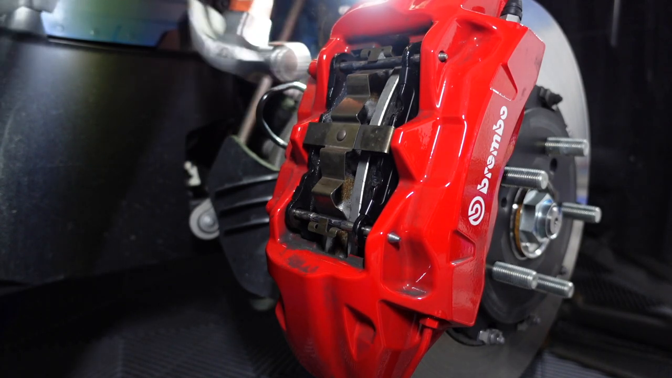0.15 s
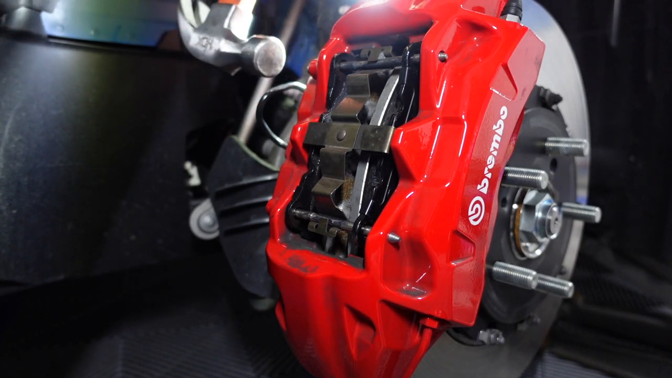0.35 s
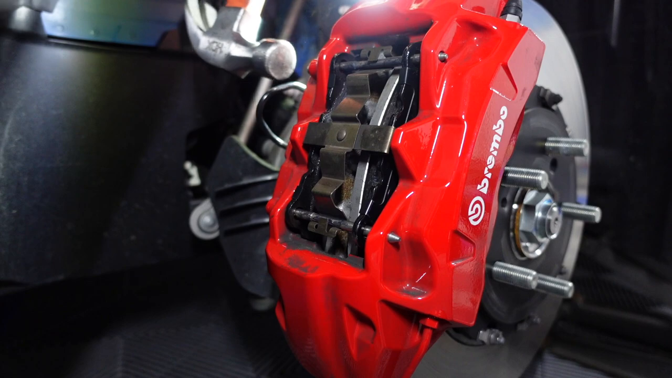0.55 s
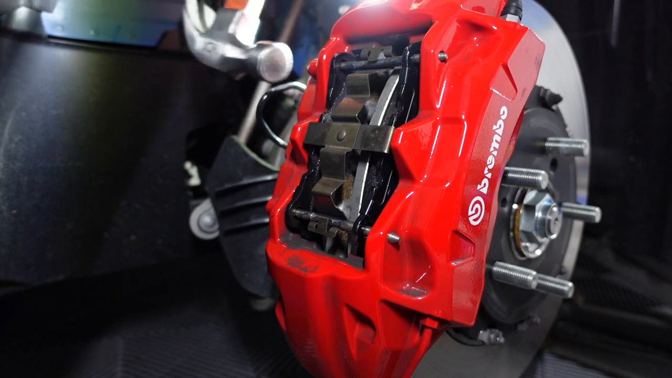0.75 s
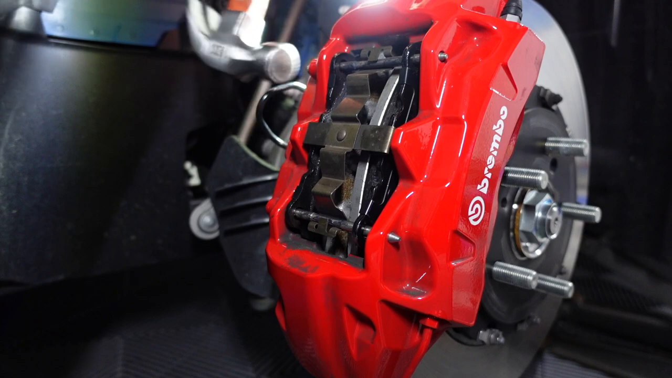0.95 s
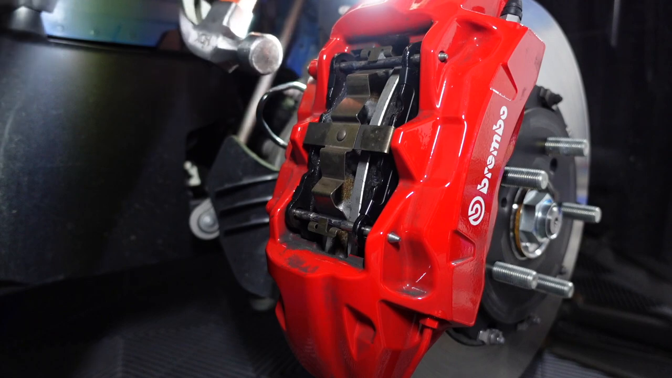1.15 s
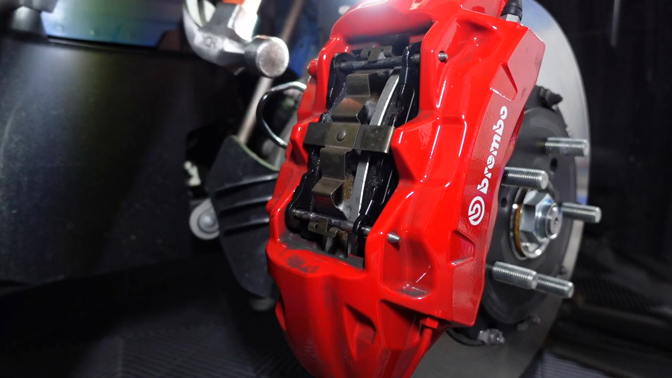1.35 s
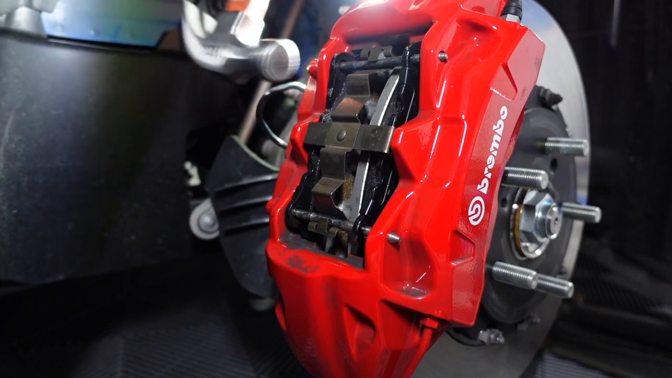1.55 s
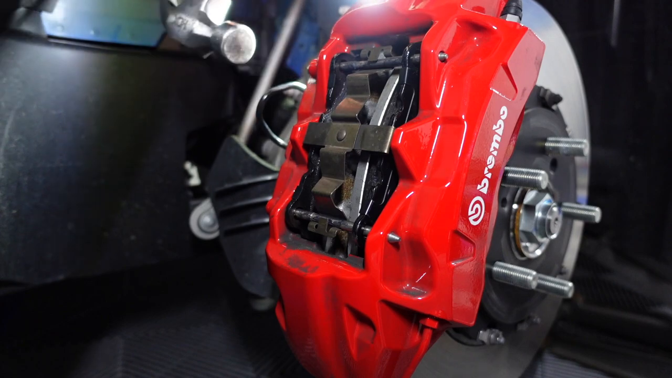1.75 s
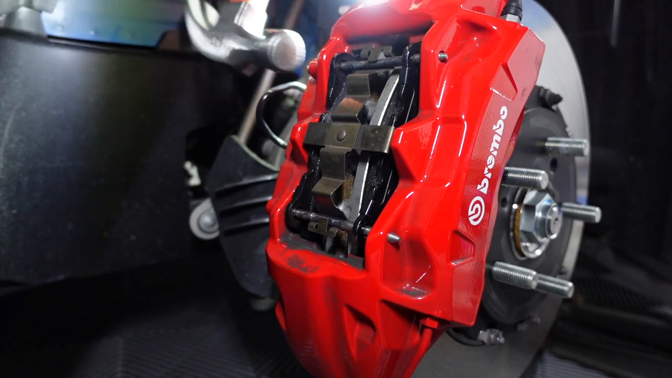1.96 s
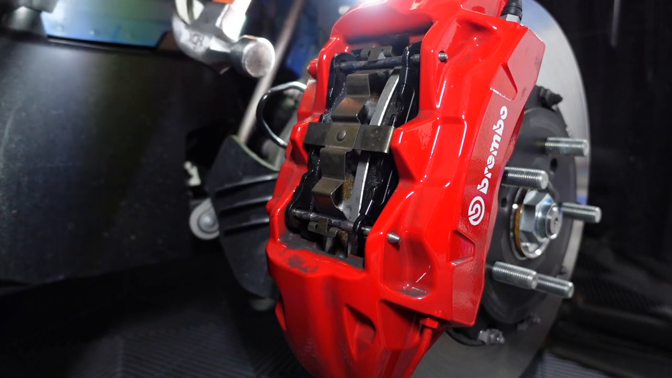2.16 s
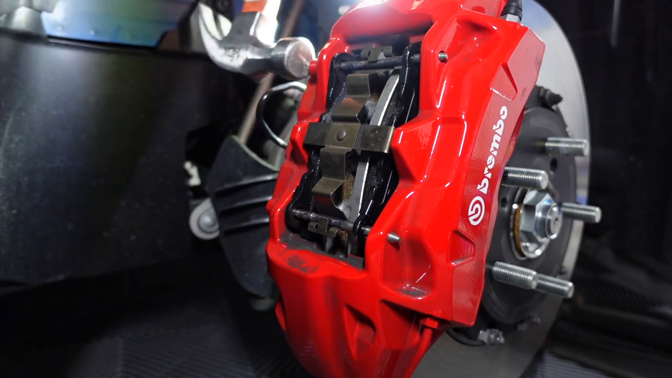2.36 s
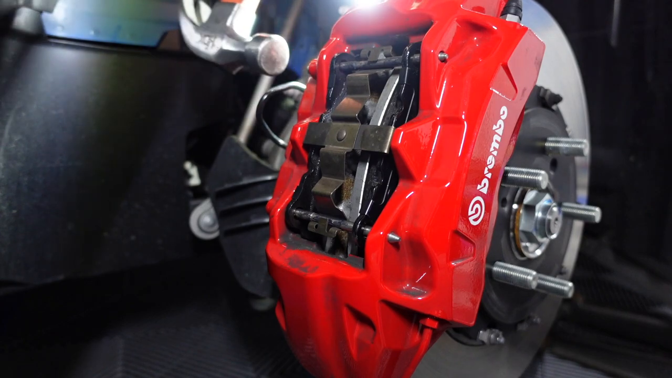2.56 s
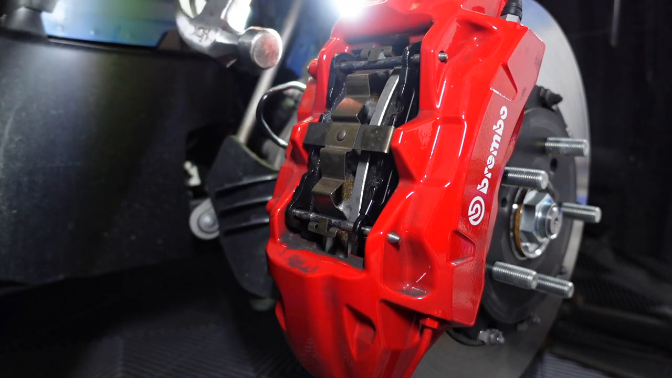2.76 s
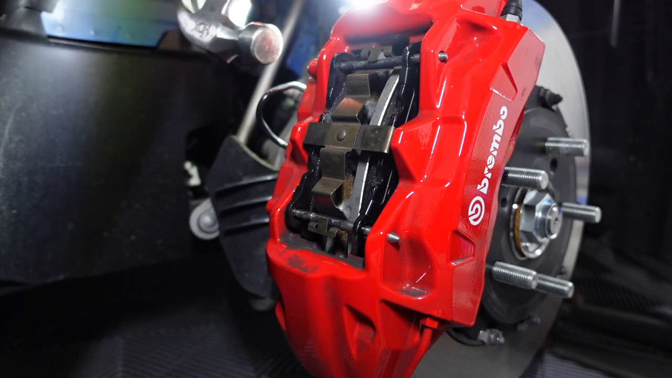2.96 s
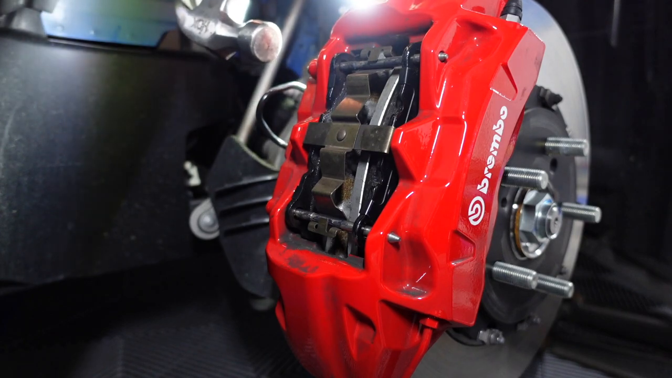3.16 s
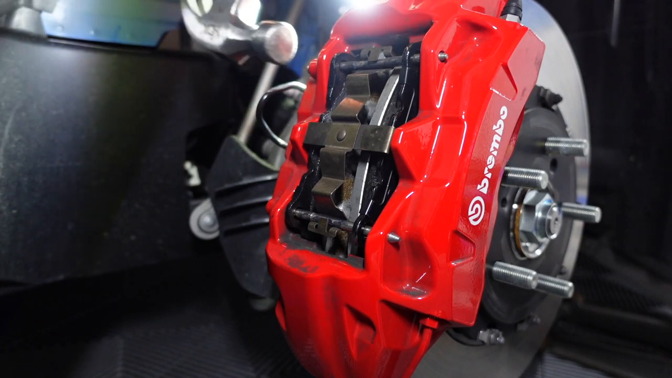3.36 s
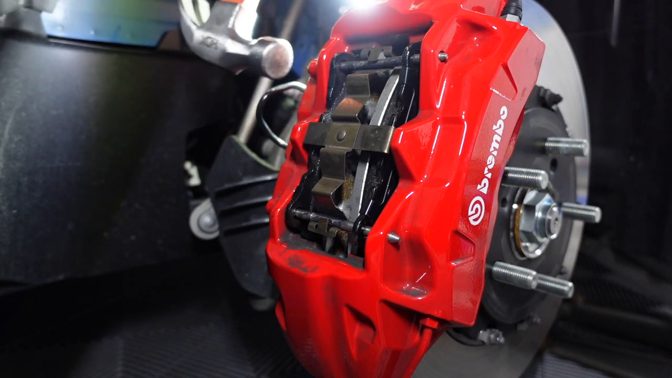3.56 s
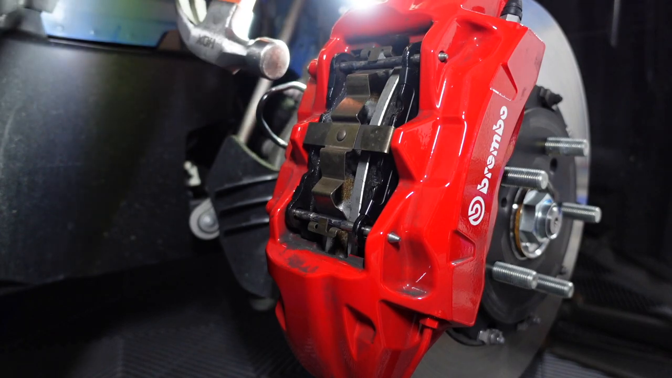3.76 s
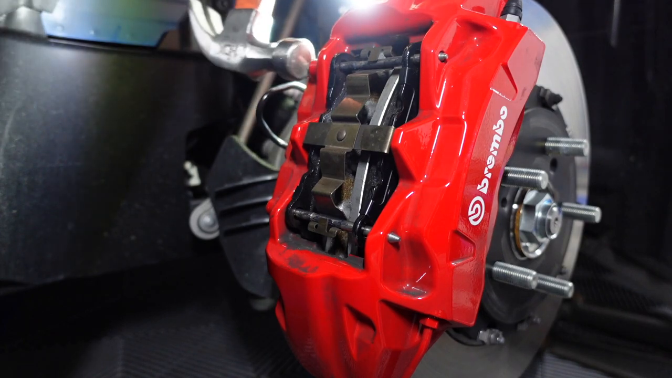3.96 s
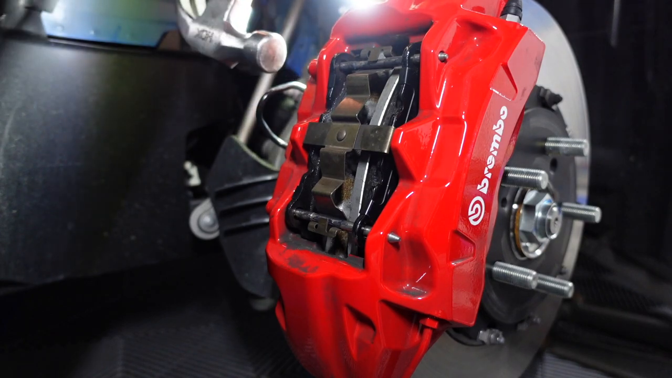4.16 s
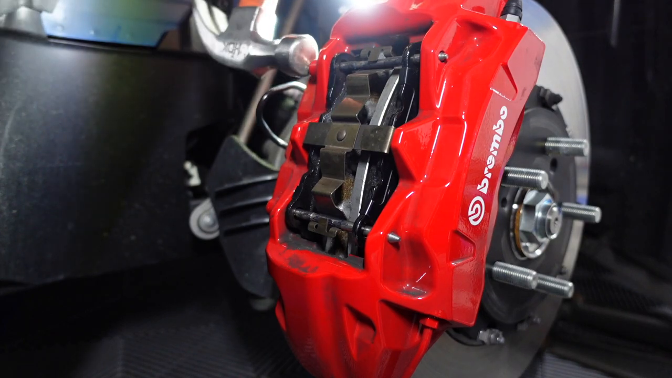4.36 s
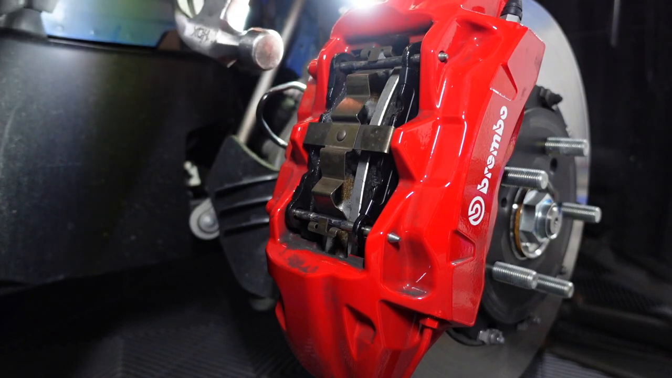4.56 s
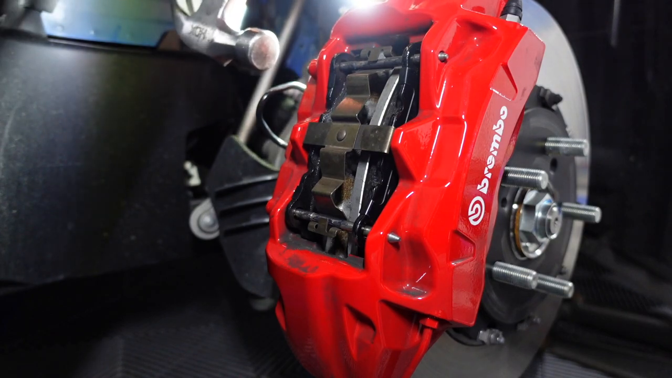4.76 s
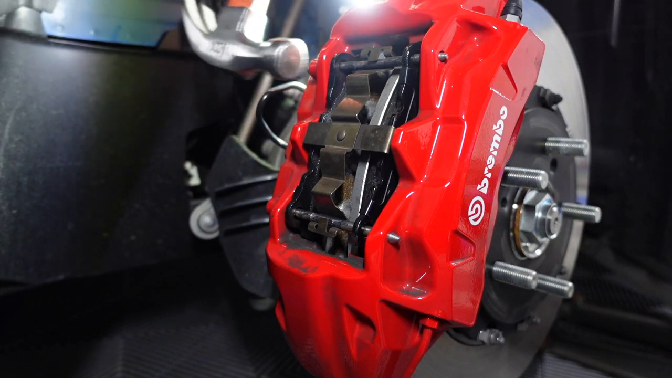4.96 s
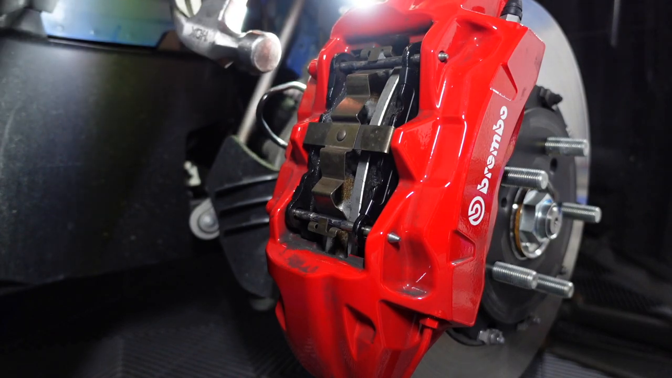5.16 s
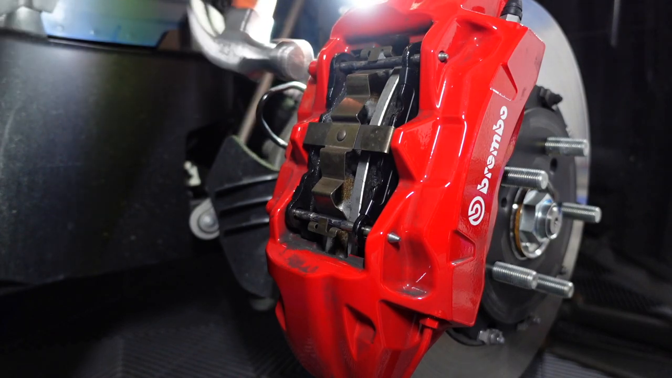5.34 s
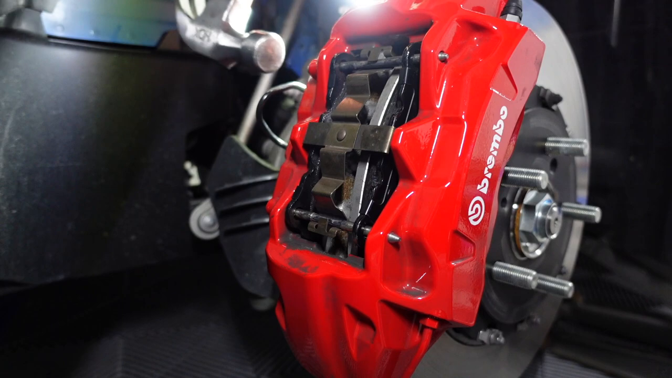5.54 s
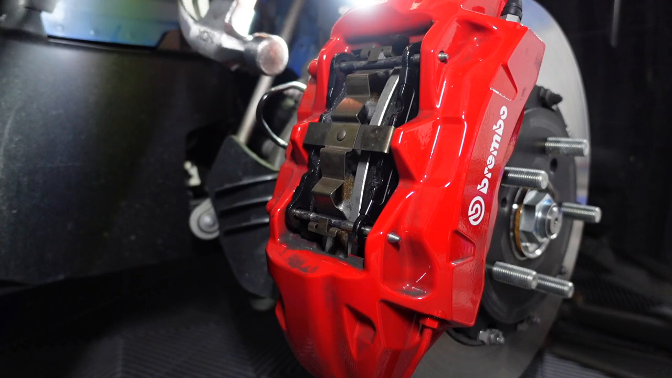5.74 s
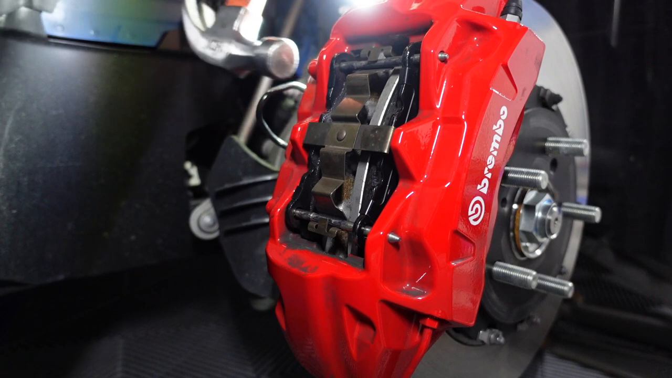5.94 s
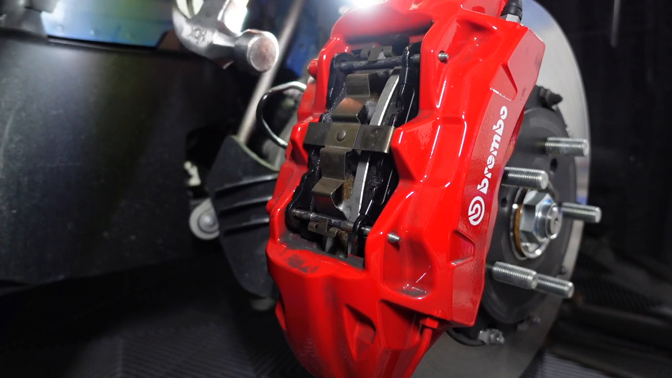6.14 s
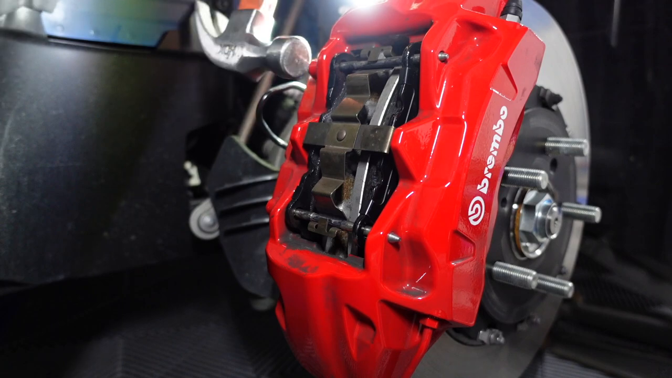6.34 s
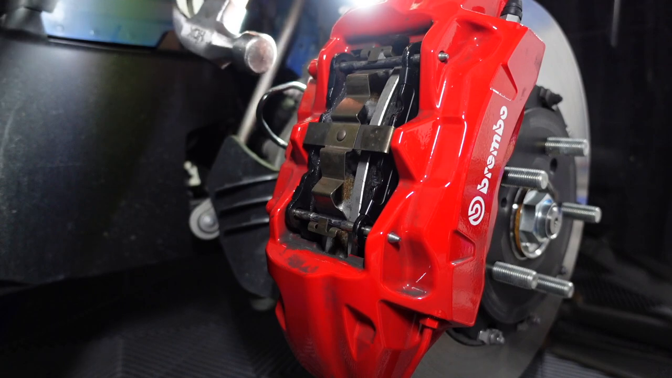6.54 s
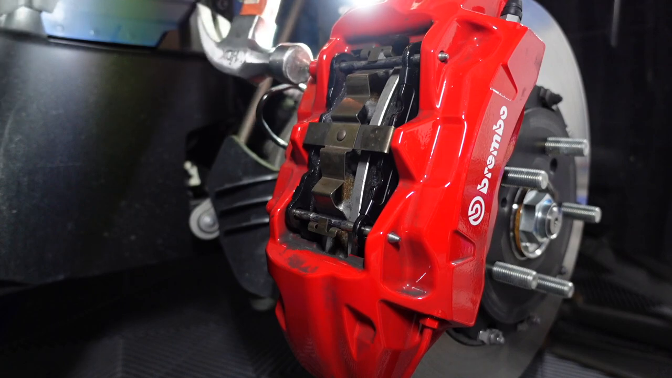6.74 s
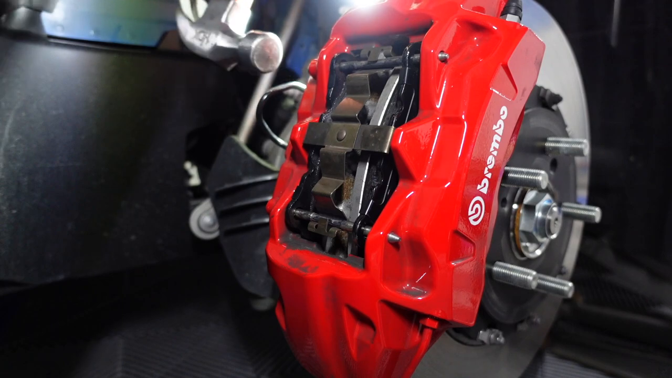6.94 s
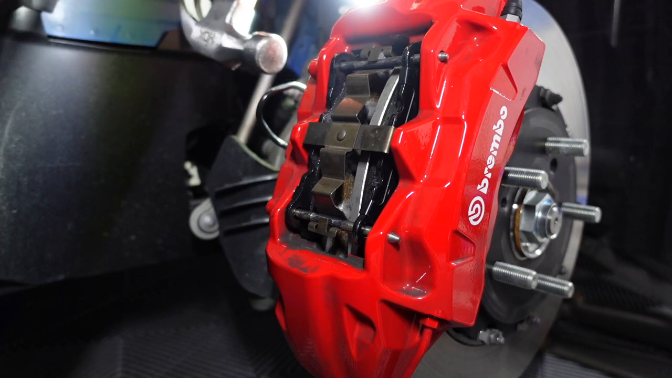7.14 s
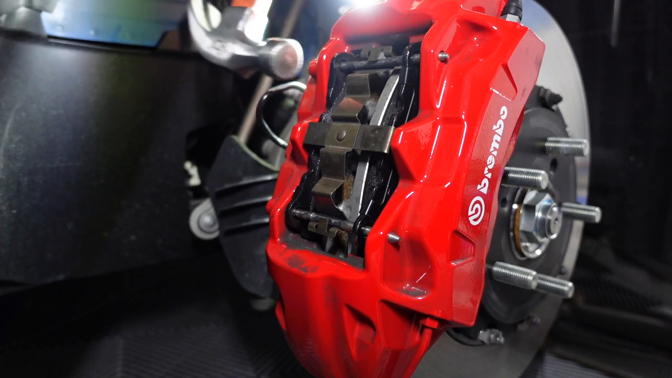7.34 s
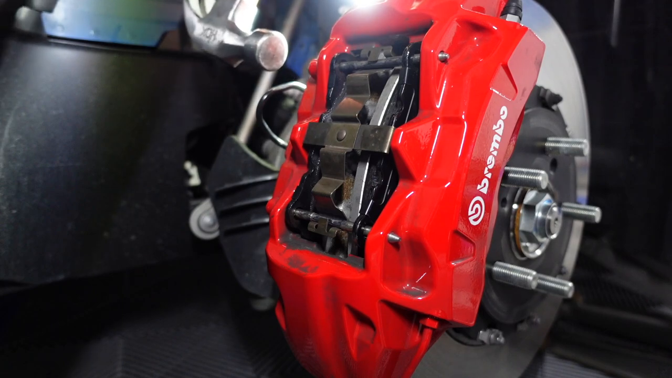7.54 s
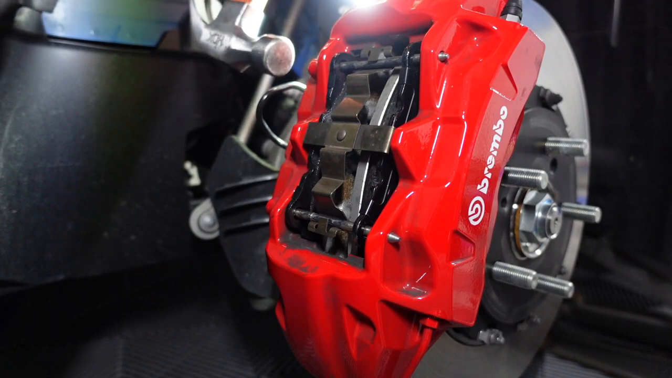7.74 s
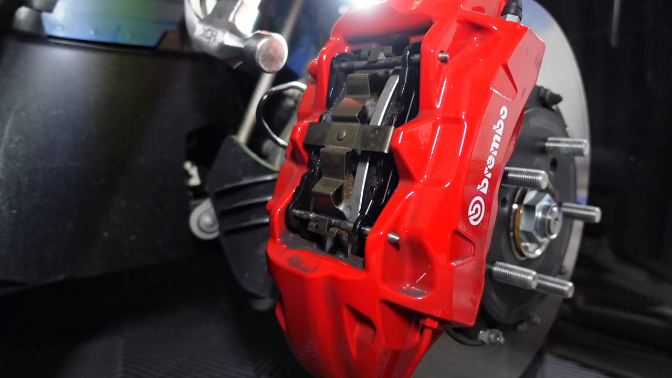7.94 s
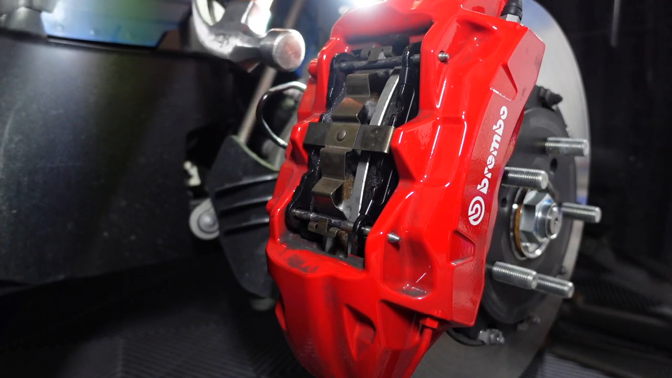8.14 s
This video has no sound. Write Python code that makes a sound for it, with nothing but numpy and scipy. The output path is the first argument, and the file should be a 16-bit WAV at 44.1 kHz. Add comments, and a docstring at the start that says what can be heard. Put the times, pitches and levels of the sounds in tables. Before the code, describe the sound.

A hammer taps steel pins in a brake caliper, two runs of bright ringing blows with a pause, echoing in a quiet garage.

```python
"""In a garage, a steel hammer taps the retaining pins through a brake caliper, in two runs with a pause
between. Each blow is a noise crack with dense echoes, pin resonances, a low boom of the room and lasting disc
modes. A square blow pings, a miss clanks on the caliper, and the ping turns to a zing as the pin binds. Far
outside a vehicle drones, as a few wavering sines; the still air is shaped noise."""
import sys
import numpy as np
from scipy import signal
from scipy.fft import rfft, irfft
from scipy.io import wavfile
from scipy.ndimage import uniform_filter1d

SR = 44100
rng = np.random.default_rng(int(sys.argv[2]) if len(sys.argv) > 2 else 0)


def inscribe(sig):
    """Save sig as 16-bit PCM at rate SR to the path in sys.argv[1].

    A 1-D sig is mono; a 2-D sig holds one channel per row.
    Samples are clipped to [-1, 1] before scaling.
    """
    pcm = np.round(np.clip(np.atleast_2d(sig).T, -1, 1) * 32767)
    wavfile.write(sys.argv[1], SR, pcm.astype(np.int16))


N = 361619

# Quickly damped resonances of pin and caliper.
# Each row: frequency in Hz, width in Hz, relative level in dB.
DAMPED = [(1330, 390, -25.5), (1760, 140, -39), (2491, 200, -22), (3094, 300, -16.5), (3620, 230, -19),
          (4950, 200, -21.5), (5905, 150, -15), (6390, 160, -22.5), (8150, 110, -32)]

RING_SIZE = 2 ** 17  # samples in one blow's response
AGE_S = np.arange(RING_SIZE) / SR
FREQ_HZ = np.maximum(np.arange(RING_SIZE // 2 + 1) * SR / RING_SIZE, 1)


def undb(db):
    """Decibels to amplitude gain."""
    return 10 ** (np.asarray(db) / 20)


def along(points, hz):
    """Read (Hz, value) points on a log-frequency axis."""
    point_hz, value = np.transpose(points)
    return np.interp(np.log(hz), np.log(point_hz), value)


def causal(gain):
    """Minimum-phase response of a gain curve: it rings after a blow, never before."""
    cepstrum = irfft(np.log(gain))
    cepstrum[1:RING_SIZE // 2] *= 2
    cepstrum[RING_SIZE // 2 + 1:] = 0
    return np.exp(rfft(cepstrum))


def walk(rate_hz):
    """Slow random drift around 0, of order 1: random steps smoothed twice."""
    hold = int(SR / rate_hz)
    steps = np.repeat(rng.standard_normal(N // hold + 1), hold)
    return uniform_filter1d(uniform_filter1d(steps, hold), hold)[:N]


def add(out, sound, start_s):
    """Mix a sound in at a time, which may lie before the start."""
    i = int(round(start_s * SR))
    part = sound[max(-i, 0):N - i]
    out[max(i, 0):max(i, 0) + len(part)] += part


def fade(t60_s, rise_s, delay_s=0):
    """Envelope that builds up after a delay and dies away exponentially."""
    t = np.maximum(AGE_S - delay_s, 0)
    return (1 - np.exp(-t / rise_s)) * np.exp(-np.log(1000) * t / t60_s)


def mode(hz, db, t60_s, rise_s, delay_s=0):
    """One decaying resonance: a sine under a fade."""
    return undb(db) * fade(t60_s, rise_s, delay_s) * np.sin(2 * np.pi * hz * (AGE_S - delay_s))


def hammer(aim_hz, ring_db, count=4):
    """Blows at one place: they share the bass of the contact noise, while its treble changes with the aim."""
    # Hammer blows; a miss lands partly on the caliper, and the pin binds in its bore as it goes home.
    # Each row: start in seconds, force in dB, miss 0-1, bind 0-1, dullness in dB per octave.
    blows = [(-0.24, -1, 0, 1, 1.1), (0.2137, 0, 0.6, .45, -0.4), (0.6344, -1, 0, 0.15, 3.5),
             (1.017, 0.5, 0.01, 0.2, 1.2), (1.4618, -1.5, 0.99, 0, -0.7), (2.0132, -15, 0.46, 0.19, 0.5),
             (2.3993, 0, 0.75, 0.24, 0.7), (3.9159, -0.73, 0.24, 0.08, .5), (4.3499, .3, 0.12, 0.18, 0.5),
             (4.893, -.5, 0, 0.16, 0), (5.3713, -0.1, 0, 0.4, 0.1), (5.85, 0.65, 0.11, 0.87, -0.26),
             (6.3398, -0.5, 0.16, .25, 0.1), (6.7619, 0, 0.2, .9, 0.13), (7.2415, -1.5, 0.19, 0.87, 0.45)]
    # The face brushes the caliper just before a miss, or on the rebound.
    # Each row: start in seconds, force in dB.
    grazes = [(0.2082, -12.5), (1.503, -6.5), (2.0566, -26.5), (2.391, -12)]
    # Lasting modes of disc, hub and caliper.
    # Each row: frequency in Hz, relative level in dB, t60 in seconds.
    lasting_modes = [(450, -34, 2.4), (523, -44, 1.9), (636, -49, 2.4), (697, -50, 2.3), (1133, -37, 0.85),
                     (1196, -40, 0.8), (1243, -42, 1.2), (1420, -43, 0.8), (1449, -41, 0.8),
                     (1538, -35, 0.9), (1785, -37, 0.65), (1842, -40, 0.85), (1914, -41, 0.8),
                     (2053, -44, 0.8), (2276, -45, 0.75), (2295, -44, 0.75), (2363, -40, 0.85),
                     (2411, -45, 0.7), (2486, -40, 0.7), (2591, -41, 0.7), (2974, -45, 0.8),
                     (3044, -43, 0.75), (3126, -40, 0.85), (3167, -46, 0.8), (5738, -47, 0.65),
                     (5976, -49, 0.7), (6073, -46, 0.7), (6446, -46, 0.7), (8071, -48, 0.72),
                     (8101, -50, 0.72)]
    # Low boom of the garage's room modes; it swells late from the walls. Each row: frequency in Hz, relative
    # level in dB, t60 in seconds, delay in seconds.
    boom_modes = [(41, -42.5, 3.2, 0.015), (60.42, -31, 1.0, 0.0038), (124.7, -46, 2.3, 0.027),
                  (228.9, -21.5, 0.25, 0.014), (249.4, -35, 1.2, 0.016), (277, -24, 0.54, 0.024),
                  (293.7, -18, 0.16, .043), (383, -31, 0.42, .02), (403, -37, 0.6, 0.038),
                  (486.4, -22.5, 0.43, 0.00975)]
    mode_favour = 1.44  # sharp modes feel the aim more than the broad sound does
    miss_snap_db, graze_snap_db = -3, -4  # change of the direct crack on a full miss, on a graze
    graze_hz = 700  # a graze is too light to move much below this

    ring = rfft(sum(mode(hz, db + ring_db, t60_s, rise_s=0.009) for hz, db, t60_s in lasting_modes))
    boom = rfft(sum(mode(hz, db, t60_s, rise_s=0.0046, delay_s=delay_s)
                    for hz, db, t60_s, delay_s in boom_modes))
    pin = rfft(tink(db=9.5))
    varied = FREQ_HZ / (FREQ_HZ + aim_hz)  # short waves feel a small shift of the contact point
    body, weak_modes = steel(), scattered_modes()
    common = body * np.sqrt(1 - varied) * contact(weak_modes)
    aims = body * np.sqrt(varied) * np.array([contact(weak_modes) for _ in range(count)])

    def strike(colour_db, snap_db):
        """One contact: crack, echoes, boom and ring, in the colour that its aim gives."""
        aim = rng.standard_normal(count)
        aim /= np.linalg.norm(aim)
        snap, echoes = common + np.tensordot(aim, aims, 1)
        broad = (snap + pin) * undb(snap_db) + echoes + boom
        coloured_broad = broad * causal(undb(colour_db))
        coloured_ring = ring * causal(undb(mode_favour * colour_db))
        return irfft(coloured_broad + coloured_ring)

    out = np.zeros(N)
    for start_s, force_db, miss, bind, dullness in blows:
        blow = strike(favour(miss, bind, dullness), miss * miss_snap_db)
        add(out, undb(force_db) * blow, start_s)
    bass_loss_db = 10 * np.log10(1 + (graze_hz / FREQ_HZ) ** 2)
    light = favour(miss=0.93, bind=0, dullness=1.2) - bass_loss_db
    for start_s, force_db in grazes:
        add(out, undb(force_db) * strike(light, graze_snap_db), start_s)
    return out


def favour(miss, bind, dullness):
    """How aim, grip on the pin and softness of contact colour a blow, in dB at each frequency."""
    # A square blow makes the pin ping. Each row: frequency in Hz, gain in dB.
    square_colour = [(400, -1.6), (1500, 0.5), (1900, -1.5), (2500, -1), (3050, 4), (3600, -1),
                     (6400, -2.5), (8100, 1.5), (10500, -0.5), (15000, -2.5)]
    # A full miss trades the ping for the clank of the caliper. Each row: frequency in Hz, change in dB.
    miss_colour = [(400, -1), (1500, -0.5), (1780, 10.5), (2600, 9.5), (3100, -3.5), (4300, 1.5),
                   (5900, -6.5), (8100, -6.5), (15000, -7.5)]
    # A tightly bound pin rings higher, with a zing. Each row: frequency in Hz, change in dB.
    bind_colour = [(400, 0.5), (1400, -6.5), (1780, 0), (2500, 1.5), (3100, -5.5), (5300, 0), (5950, 6.5),
                   (6450, 4), (7200, -2.5), (15000, 1)]
    dull_hz = 1700  # a soft contact loses treble from here up
    octaves = np.log2(np.maximum(FREQ_HZ / dull_hz, 1))
    aim_db = along(square_colour, FREQ_HZ) + miss * along(miss_colour, FREQ_HZ)
    return aim_db + bind * along(bind_colour, FREQ_HZ) - dullness * octaves


def steel():
    """Response of the struck parts: damped resonances add their power to a broad colour."""
    # Broad colour of steel on steel. Each row: frequency in Hz, relative level in dB.
    broad_colour = [(25, -22), (65, -12), (110, -16), (170, -22), (230, -7), (480, -5.5), (620, -11),
                    (1300, -12), (2600, -26.5), (4200, -23.5), (6800, -22), (9800, -39.5), (15000, -47.5)]
    power = undb(along(broad_colour, FREQ_HZ)) ** 2
    for hz, width_hz, db in DAMPED:
        detuning = (FREQ_HZ / hz - hz / FREQ_HZ) * hz / width_hz
        power = power + undb(db) ** 2 / (1 + detuning ** 2)
    return causal(np.sqrt(power))


def tink(db):
    """The damped resonances straight from the struck pin: the wider each is, the sooner it dies."""
    return sum(mode(hz, db + level_db, t60_s=np.log(1000) / (np.pi * width_hz), rise_s=0.00051)
               for hz, width_hz, level_db in DAMPED)


def scattered_modes():
    """Host of weak modes: part of the power gathers into thin lines at random frequencies."""
    # Share of the tail's power that the weak modes carry. Each row: frequency in Hz, share 0-1.
    weak_share = [(700, 0), (1400, .35), (3000, .3), (14000, .15)]
    mean_spacing_hz = 40
    chance = SR / RING_SIZE / mean_spacing_hz
    share = along(weak_share, FREQ_HZ)
    lines = rng.random(len(FREQ_HZ)) < chance
    return np.sqrt(1 - share + share * lines / chance)


def contact(weak_modes):
    """Spectra of one crack and of its echoes, before the steel colours them."""
    direct = crack(db=14, t60_s=0.091, corner_hz=3340)
    echoes = undb(0.45) * reflections(weak_modes, rise_s=0.0013)
    return rfft([direct, echoes])


def crack(db, t60_s, corner_hz):
    """Direct sound of the contact: a noise burst, high-passed as small parts radiate mostly treble."""
    burst = rng.standard_normal(RING_SIZE) * fade(t60_s, rise_s=0.0001)
    return undb(db) * signal.sosfilt(signal.butter(1, corner_hz, "high", fs=SR, output="sos"), burst)


def reflections(weak_modes, rise_s, count=16):
    """Dense wall echoes of the ringing assembly: noise in bands that each die at their own rate."""
    # Reverberation of the garage. Each row: frequency in Hz, t60 in seconds.
    garage_decay = [(50, 1.4), (280, 0.81), (740, 0.76), (1900, 0.84), (3200, 0.78), (6000, 0.7),
                    (9000, 0.59), (14000, 0.25)]
    noise = rfft(rng.standard_normal(RING_SIZE)) * weak_modes
    centres_hz = np.geomspace(garage_decay[0][0], garage_decay[-1][0], count)
    echoes = np.zeros(RING_SIZE)
    for hz, row in zip(centres_hz, np.eye(count)):
        band = np.interp(np.log(FREQ_HZ), np.log(centres_hz), row)  # overlapping triangles
        echoes += irfft(noise * band) * fade(along(garage_decay, hz), rise_s)
    return echoes


def far_engine(waver, flutter_db):
    """Only the lowest exhaust lines come through the walls: harmonics of a wavering cycle rate."""
    # Distant engine. Each row: time in seconds, mean cycle rate in Hz, relative level in dB.
    engine_course = [(0.0, 18.2, -56), (2.65, 19.6, -63), (3.68, 21.1, -63), (4.04, 18, -59.5),
                     (4.73, 16.5, -55.5), (5.14, 19.2, -43), (5.8, 19.8, -47.5), (6.05, 17.6, -39.5),
                     (6.69, 21.3, -47), (7.47, 23.5, -46.5), (7.6, 19, -47), (8.2, 25.3, -57)]
    # Exhaust lines. Each row: multiple of the cycle rate, relative level in dB.
    exhaust_lines = [(2, -4), (3, -4.5), (4, -4.5), (5, 0), (6, -12.5)]
    time_s, rate_hz, level_db = np.transpose(engine_course)
    t = np.arange(N) / SR
    cycle_hz = np.interp(t, time_s, rate_hz) * (1 + waver * walk(8.3))
    turns = np.cumsum(cycle_hz) / SR
    lines = np.zeros(N)
    for multiple, line_db in exhaust_lines:
        lines += undb(line_db + flutter_db * walk(5)) * np.sin(2 * np.pi * multiple * turns)
    return lines * undb(-0.5 + np.interp(t, time_s, level_db))


def air(swell_db):
    """Still air as shaped noise: a low rumble that swells a little, under a faint even hiss."""
    # Spectrum of the air. Each row: frequency in Hz, relative level in dB per Hz.
    air_spectrum = [(20, -8), (40, 1.5), (100, -11.5), (170, -12.5), (300, -17), (450, -27), (700, -30),
                    (1100, -29.5), (2000, -39), (6500, -47), (15000, -53.5)]
    level_db = -54.5  # RMS before the swell
    hz = np.maximum(np.arange(N // 2 + 1) * SR / N, 1)
    noise = irfft(rfft(rng.standard_normal(N)) * undb(along(air_spectrum, hz)), N)
    rumble = signal.sosfilt(signal.butter(2, 150, fs=SR, output="sos"), noise)
    swell = undb(swell_db * walk(4.6)) - 1
    return (noise + rumble * swell) * undb(level_db) / np.std(noise)


def scene():
    """Hammering close by over the quiet garage."""
    blows = hammer(aim_hz=5050, ring_db=-0.23)
    engine = far_engine(waver=0.01, flutter_db=4)
    return (blows + engine + air(swell_db=3.0))[None]


def record(dry):
    """The recorder rounds the highest peaks and cuts the top."""
    top_hz = 15500
    return signal.sosfilt(signal.ellip(8, 0.2, 70, top_hz, fs=SR, output="sos"), np.tanh(dry))


dry = scene()
out = record(dry)
inscribe(out)
```